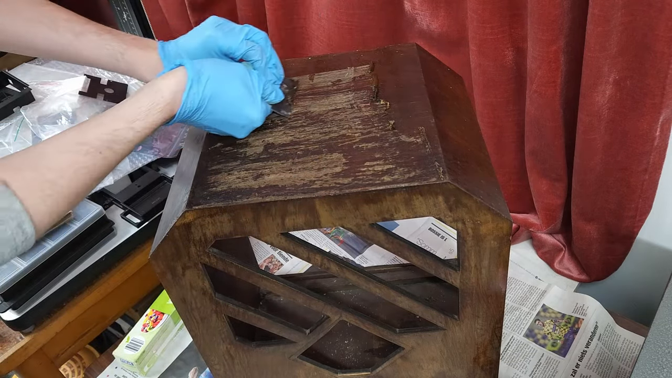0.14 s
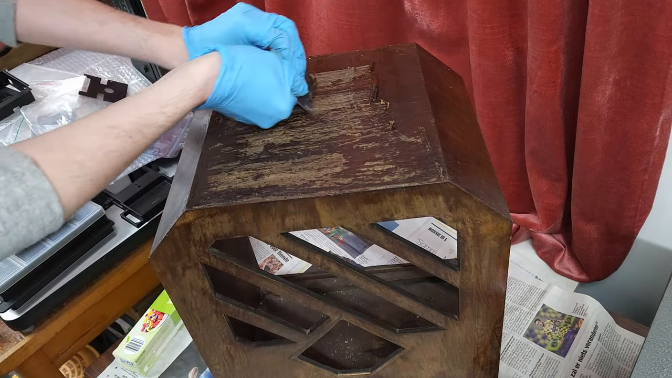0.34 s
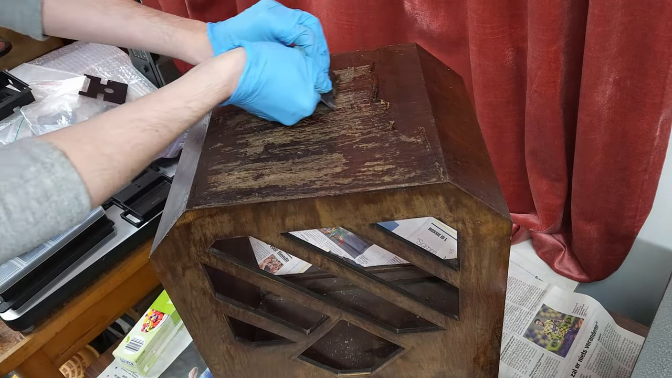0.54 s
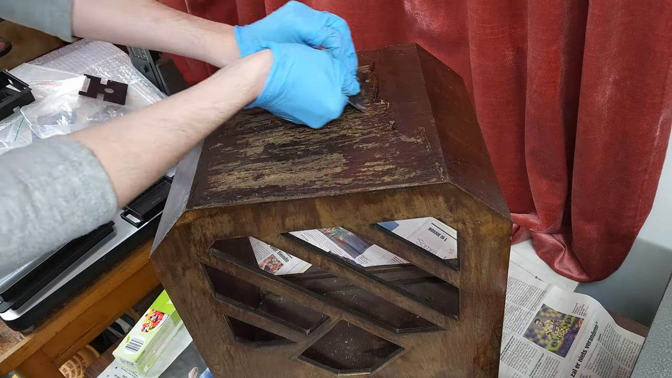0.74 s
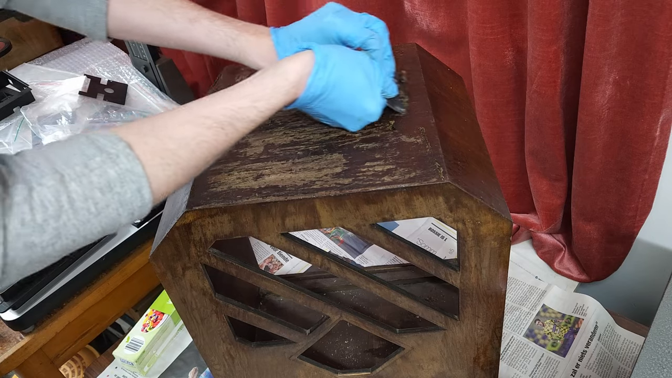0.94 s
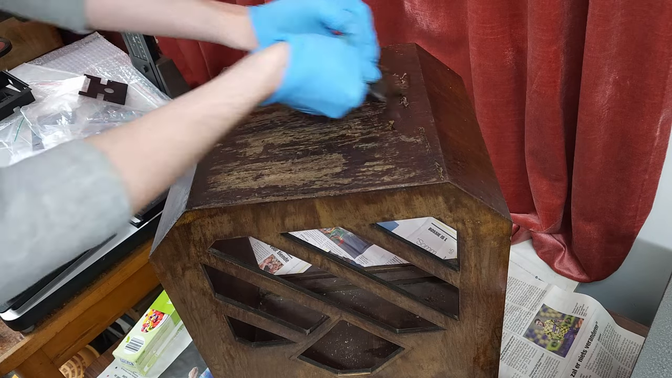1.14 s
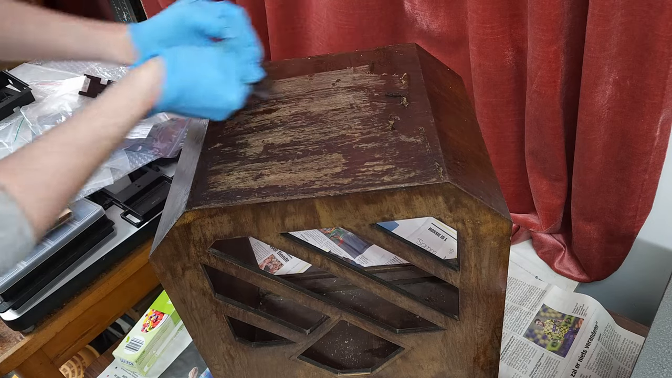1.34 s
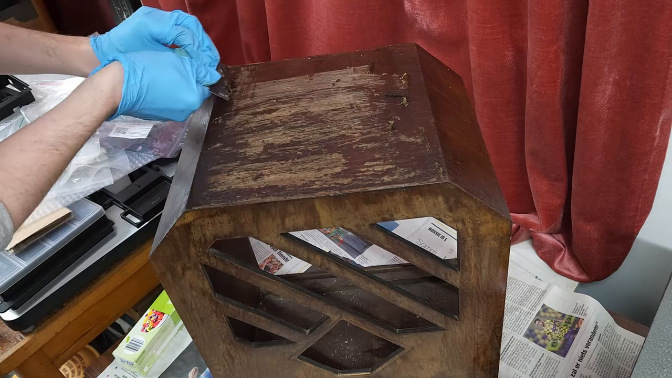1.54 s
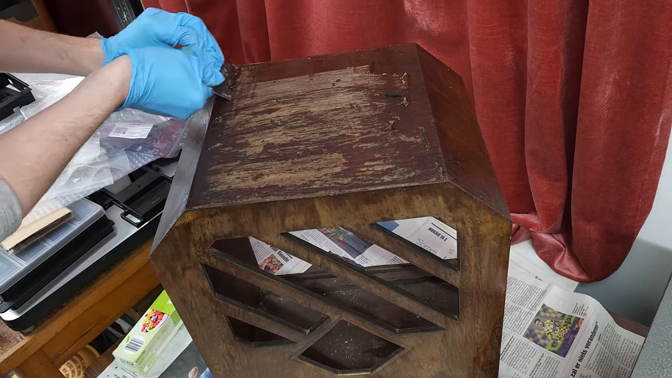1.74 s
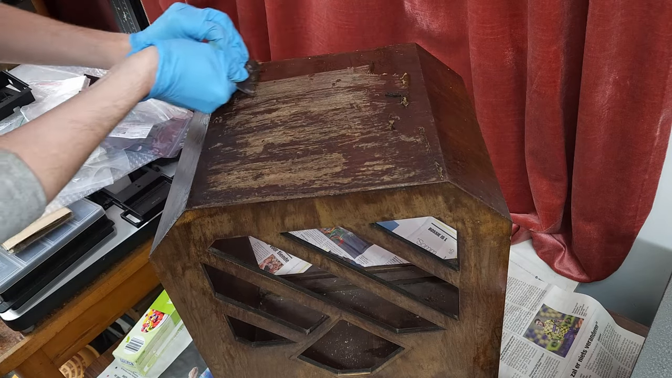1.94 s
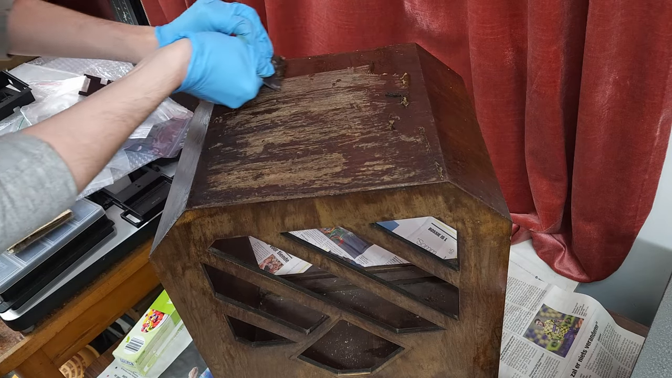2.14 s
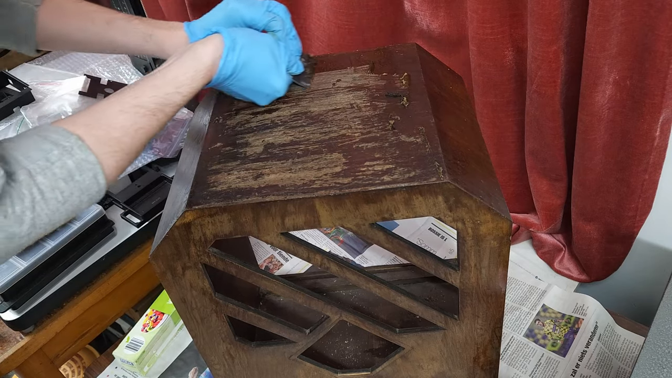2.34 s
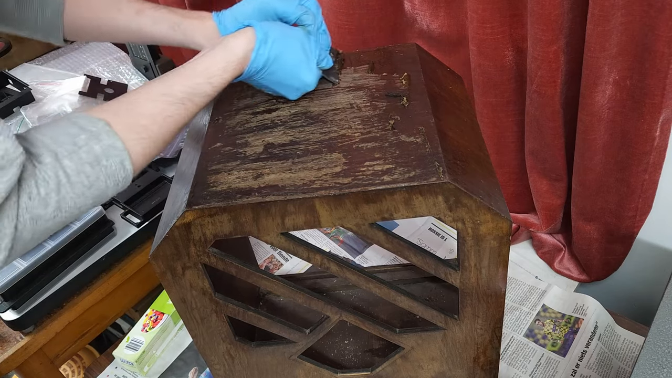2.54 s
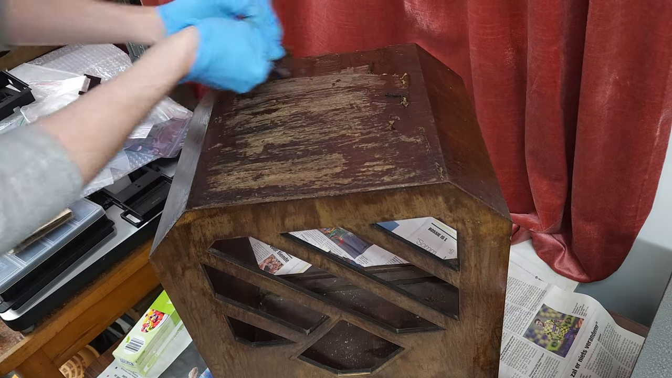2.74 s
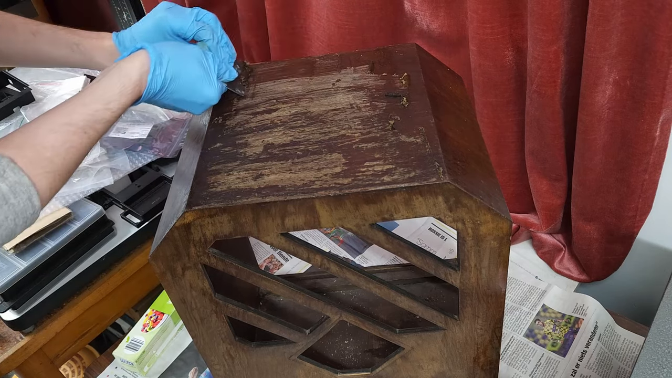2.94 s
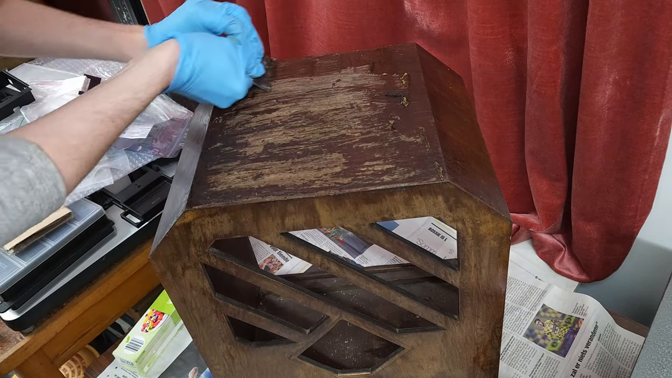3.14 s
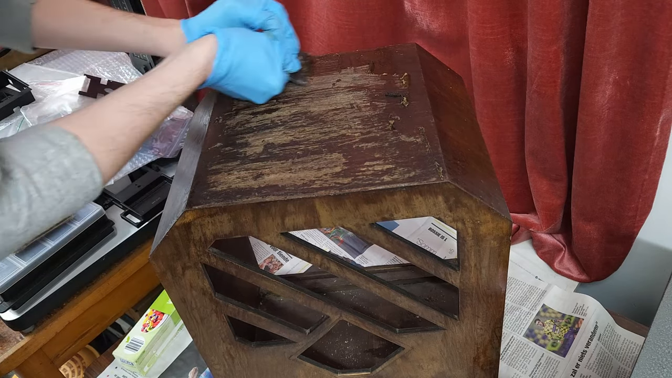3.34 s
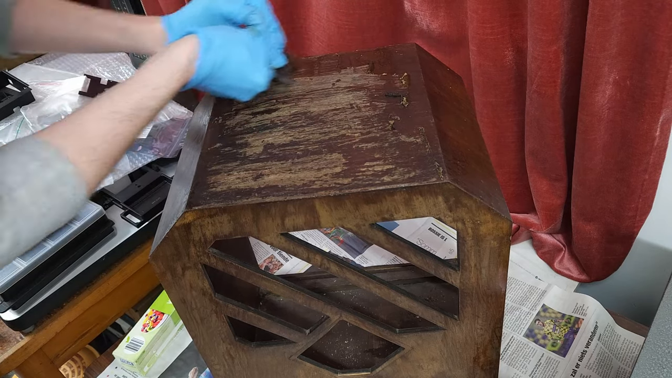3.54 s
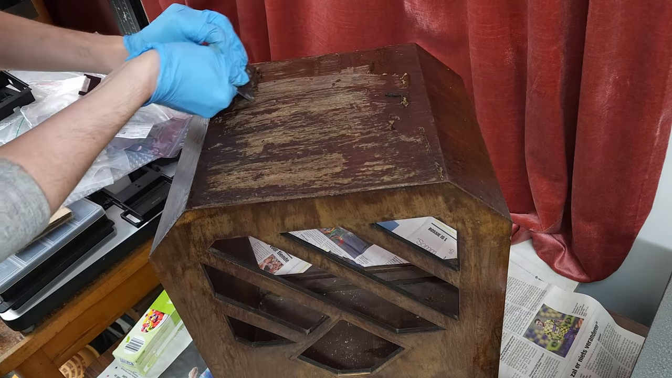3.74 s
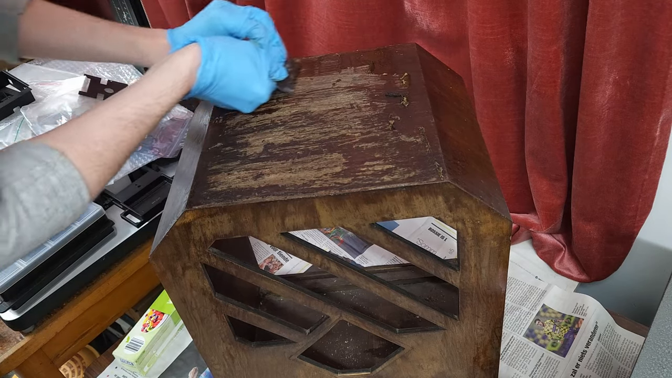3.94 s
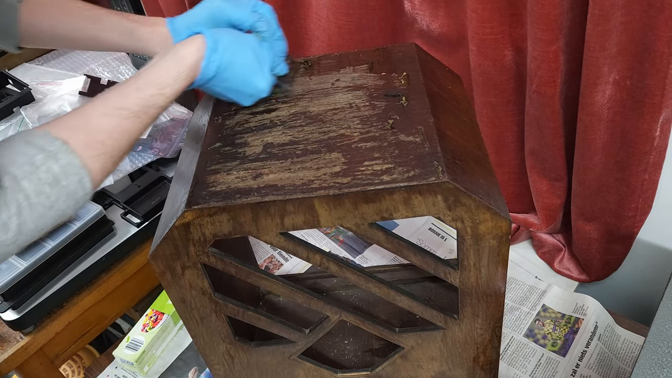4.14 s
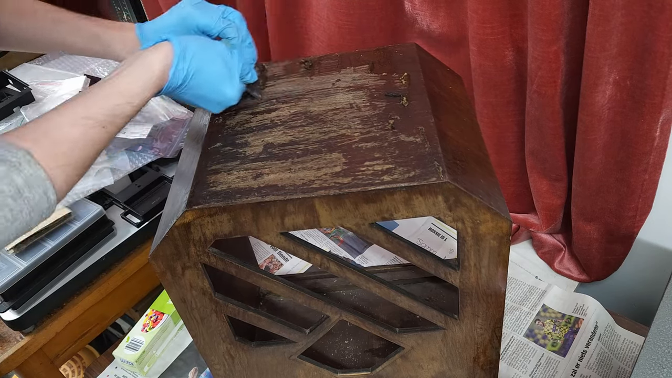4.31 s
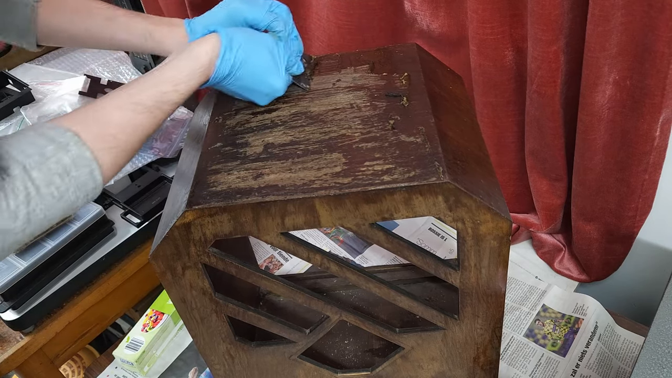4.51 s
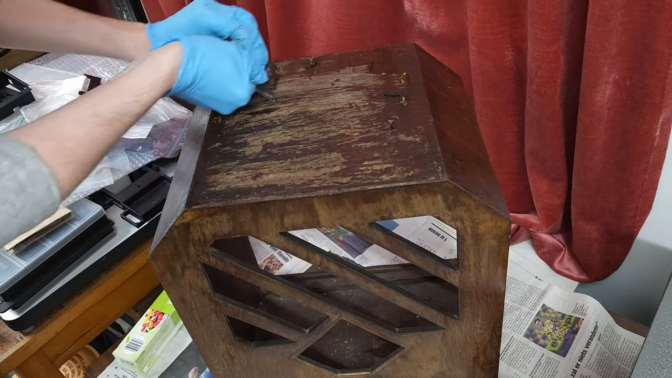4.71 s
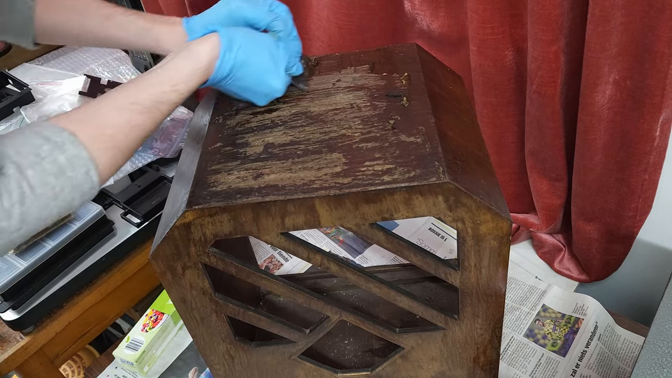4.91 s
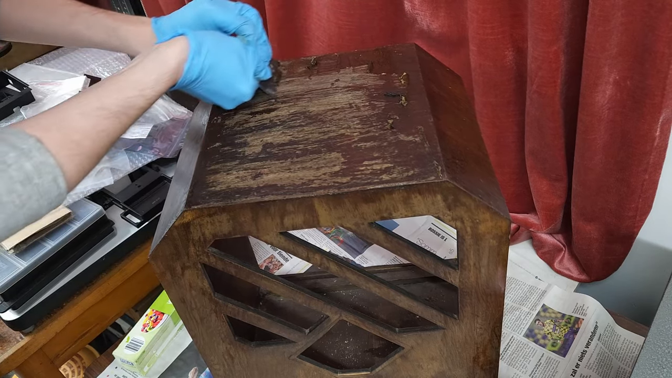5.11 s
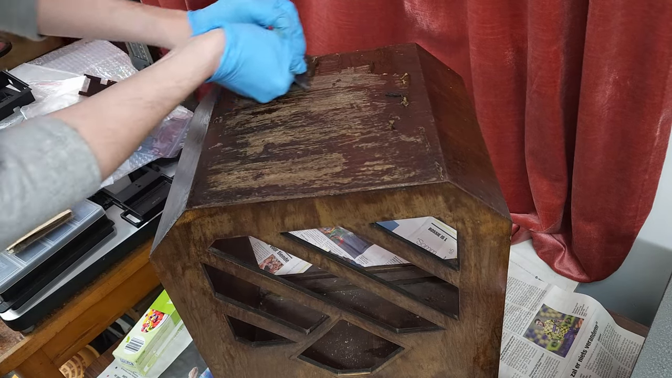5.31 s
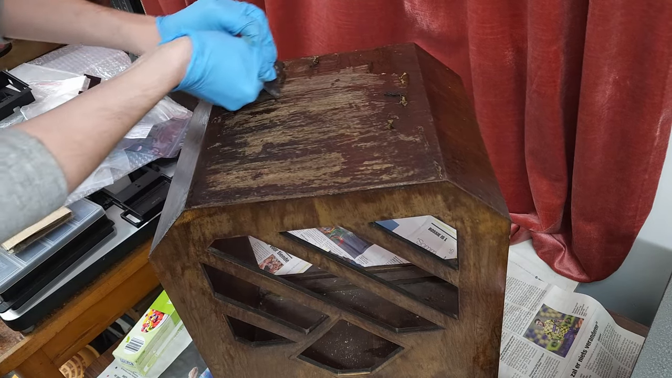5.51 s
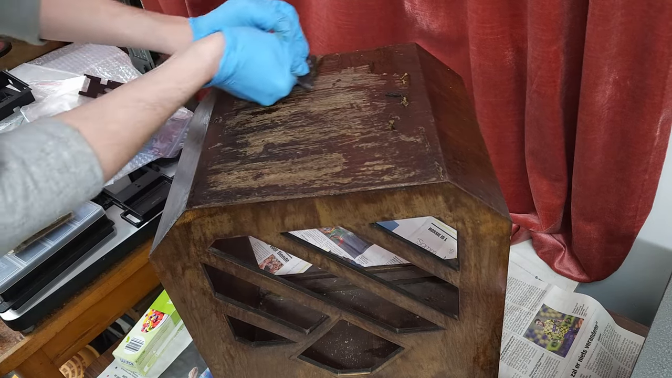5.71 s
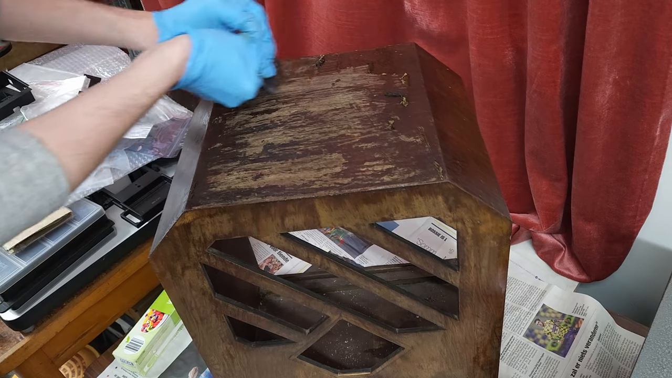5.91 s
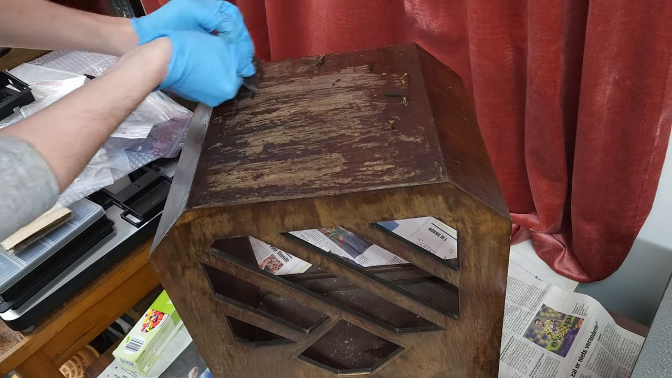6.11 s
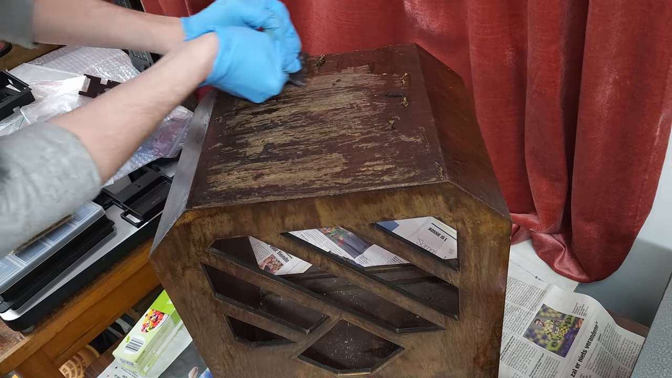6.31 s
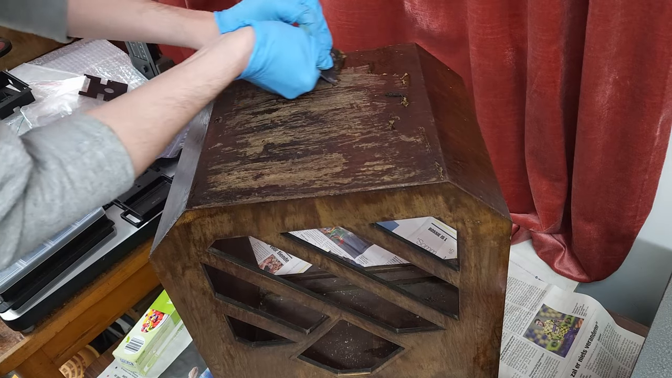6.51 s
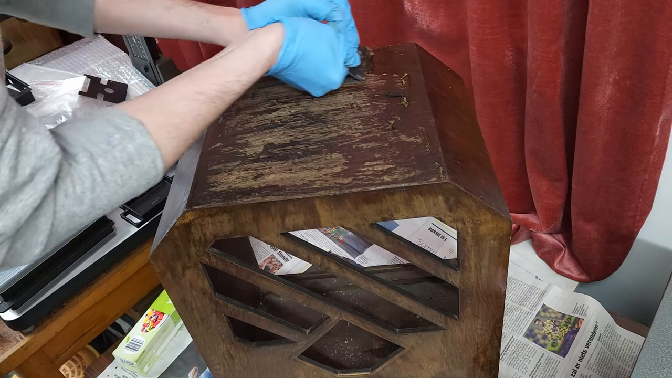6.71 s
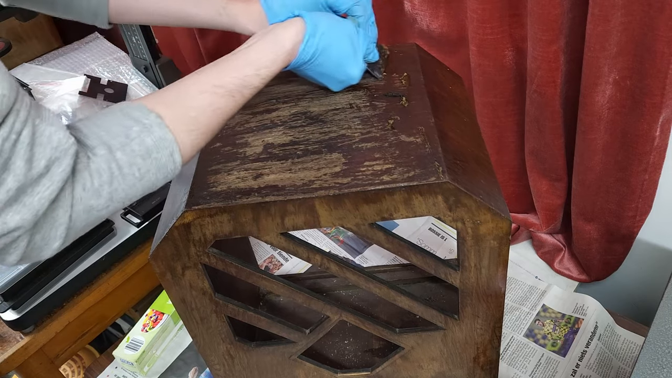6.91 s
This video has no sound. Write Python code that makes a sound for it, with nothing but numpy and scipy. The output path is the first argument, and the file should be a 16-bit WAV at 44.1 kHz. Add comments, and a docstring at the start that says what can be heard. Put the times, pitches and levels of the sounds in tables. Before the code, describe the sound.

Long, crackly scrapes of a steel blade strip varnish from a wooden cabinet, with a slight metallic ring and a hollow judder from the wood. After a brief pause and more long pushes comes a run of short strokes with ticks and dull bumps. Two hard clacks lead into three longer, fading scrapes. It is heard from about a metre away in a small, quiet room.

```python
"""In a quiet small room, a steel scraper is pushed in long strokes over a hollow wooden cabinet.
Its edge tears varnish in dense grains that ring blade and board; its judder drives the box's boom
and panel modes. The edge clacks as it lands or catches, and the hands jolt the cabinet. From 3 s the
strokes turn short; near 6 s come the hardest clacks, then three longer strokes, each one softer.
A phone with two close ports listens from a metre away."""
import sys
import numpy as np
from scipy import signal
from scipy.fft import rfft, irfft, next_fast_len
from scipy.io import wavfile
from scipy.ndimage import uniform_filter1d

SR = 44100
rng = np.random.default_rng(int(sys.argv[2]) if len(sys.argv) > 2 else 0)


def wrap_up_sound(samples):
    """Save the sound to the file named by the first command line argument, as 16-bit audio."""
    columns = np.atleast_2d(samples).T
    # keep every value between -1 and 1, then stretch to whole-number steps
    tamed = np.clip(columns, -1, 1)
    steps = np.round(tamed * 32767).astype(np.int16)
    wavfile.write(sys.argv[1], SR, steps)


N = 306936

# Strokes, split where the blade hitches; cue levels here and below are pre-mix:
# full contact t/s, length/s, base time to rise 20 dB/s, rasp level/dB, its change/dB, bite over rasp/dB,
# sheen over rasp/dB, panel level/dB, its change/dB, boom level/dB, its change/dB, bench level/dB
STROKES = [(-0.035, 0.213, 0.012, -53.0, -7.0, 3.0, -13.0, -46.0, -2.5, -38.0, -6.5, -57.5),
           (0.15, 0.182, 0.017, -68.0, -3.0, 7.5, -22.5, -59.0, 3.0, -50.0, -9.0, -78.0),
           (0.436, 0.395, 0.089, -54.0, 0.5, 2.5, -15.5, -51.0, -6.5, -55.0, 7.5, -59.5),
           (0.805, 0.204, 0.09, -55.0, -3.5, -1.0, -13.5, -73.0, 1.0, -64.5, 0.5, -65.0),
           (1.07, 0.07, 0.02, -85.0, -3.0, -0.5, -16.0, -79.0, -3.0, -72.0, -4.0, -80.0),
           (1.881, 0.326, 0.068, -57.0, -2.0, 2.0, -13.0, -54.5, 7.5, -47.5, 12.5, -64.5),
           (2.215, 0.366, 0.09, -58.0, 2.5, 5.0, -14.0, -46.5, -2.5, -50.5, 3.0, -56.5),
           (2.652, 0.022, 0.022, -53.0, -5.0, 0.5, -9.5, -57.0, -5.5, -71.0, 14.0, -78.0),
           (3.08, 0.09, 0.033, -54.0, 3.0, 2.0, -8.0, -45.0, 3.0, -38.5, -0.5, -56.0),
           (3.232, 0.205, 0.09, -58.0, 9.5, 3.0, -7.5, -46.5, 3.0, -40.0, -2.5, -61.0),
           (3.832, 0.244, 0.027, -50.0, -4.5, 3.0, -10.5, -45.0, -5.0, -38.0, -7.0, -55.5),
           (4.169, 0.122, 0.031, -53.0, 5.0, 1.5, -2.0, -49.0, 1.5, -55.0, 14.0, -71.5),
           (4.404, 0.144, 0.025, -42.5, -6.0, 1.0, -8.5, -45.5, 1.5, -38.0, -0.5, -55.0),
           (4.669, 0.099, 0.048, -50.0, -6.5, 1.5, -5.0, -47.5, -3.5, -49.0, 9.5, -70.0),
           (4.863, 0.1, 0.032, -48.5, 3.5, 1.5, -9.5, -47.0, 3.0, -44.0, 9.5, -50.5),
           (5.088, 0.099, 0.036, -46.0, -14.0, 1.0, -4.5, -46.5, -6.5, -40.5, -1.5, -58.0),
           (5.271, 0.1, 0.021, -44.5, 1.0, 0.5, -7.5, -44.5, 3.0, -43.0, 11.0, -49.5),
           (5.482, 0.069, 0.043, -51.5, -4.0, 2.0, -5.5, -48.0, 0.5, -56.0, 9.5, -57.5),
           (5.672, 0.086, 0.021, -49.5, 2.0, 2.5, -11.5, -49.0, 2.5, -48.5, 2.5, -52.5),
           (5.892, 0.143, 0.037, -55.0, 8.0, 0.5, -4.0, -63.0, 8.5, -56.0, 7.0, -77.5),
           (6.195, 0.217, 0.036, -44.5, -11.0, -2.5, -13.0, -40.0, -7.0, -40.5, -0.5, -64.0),
           (6.425, 0.246, 0.015, -64.0, -0.5, 4.0, -16.0, -53.5, -7.0, -58.5, 2.5, -77.5),
           (6.668, 0.193, 0.012, -72.5, 6.0, 3.0, -18.5, -66.0, 3.5, -67.0, 11.5, -76.5)]
# Tone of the tearing varnish: f/Hz, level/dB
RASP_EQ = [(1200, -14), (2500, -4.5), (4000, -10.5), (5500, -10.5), (8000, -13.5), (9400, -17),
           (11000, -30)]
SHEEN_EQ = [(7000, -30), (9800, 0), (12500, -1), (15500, -6)]
# Resonances of blade and cabinet, high to low: f/Hz, width/Hz, level/dB
BLADE_MODES = [(2560, 320, -1), (3640, 330, 0), (4830, 330, -3), (6170, 380, -5), (7400, 450, -7)]  # steel ring
BITE_MODES = [(856, 144, -3), (1208, 108, 0), (1480, 110, -4), (1655, 123, -.5), (1839, 110, -2),
              (2195, 307, -5.5)]  # midrange bite
PANEL_MODES = [(399, 36.3, -4.5), (479, 13.2, 2), (528.5, 32.6, -1), (576, 44, -2), (577, 17.4, -0.5),
               (652.3, 29, -4.5)]  # woody body
BOOM_MODES = [(195, 30, -12), (241, 14, 0), (266, 25, -10)]  # hollow box
BENCH_MODES = [(131.7, 45, -7.5), (134.7, 13.3, 4), (166.6, 8.3, -3)]  # bass weight
ROCK_MODE = [(62, 22, 0)]  # cabinet rocking
# House rumble and hiss: f/Hz, level/dB
ROOM_TONE_EQ = [(25, -16), (60, -5), (240, -2), (530, -8), (720, -18.5), (1000, -12.5), (1250, -23),
                (1600, -20), (2500, -29.5), (8700, -27.5), (9500, -44), (15500, -40)]
# The edge lands or catches, or a flake snaps: t/s, level/dB, t60/s, clack f/Hz, clack share, top f/Hz
TAPS = [(.45, -50, .25, 1700, 1.8, 2400), (1.152, -74.5, .06, 7050, 1.2, 8500),
        (1.661, -49.5, .075, 1200, 1.3, 5100), (2.035, -50, .051, 7340, 1, 13000),
        (2.957, -41, .11, 2400, .29, 6940), (3.073, -50, .04, 1200, .6, 4000),
        (3.145, -47.5, .04, 9100, .7, 14000), (3.424, -45, .027, 9100, .69, 14000),
        (3.722, -52.5, .09, 1590, .59, 2460), (3.815, -44, .085, 860, .66, 3980),
        (4.394, -41, .04, 1650, .6, 6000), (4.852, -43, .04, 1650, .6, 6000),
        (5.666, -44, .04, 1650, .6, 6000), (5.985, -31.5, .046, 1560, 1.8, 3530),
        (6.018, -38.5, .16, 1450, 1.5, 3500), (6.175, -39, .04, 860, .6, 4000)]
# Jolts from the hands: t/s, boom level/dB, bench level/dB, rocking level/dB
JOLTS = [(.62, -44, -66, -71), (.97, -46, -58, -73), (1.93, -46, -62, -80), (2.04, -35, -43, -69),
         (2.35, -35, -47, -75), (2.73, -56, -50, -63), (2.97, -66, -80, -88), (3.13, -34, -52, -73),
         (3.53, -54, -75, -84), (3.73, -64, -76, -88), (4.4, -43, -52, -68), (5.31, -38, -60, -58),
         (6.17, -34, -48, -65), (6.91, -62, -53, -78)]
# The phone's microphone response: f/Hz, level/dB
MIC_EQ = [(20, 0), (8900, 0), (9500, -11), (16000, -13)]

# How each layer follows a stroke: rise time multiplier, release/(dB/s), dip at both ends/dB
RASP_SHAPE, BITE_SHAPE, SHEEN_SHAPE = (1.01, 390, 3.3), (1.05, 400, 2.3), (.94, 345, 5.6)
PANEL_SHAPE, BOOM_SHAPE, BENCH_SHAPE = (1.05, 270, 1.5), (1.2, 165, 3.2), (1.6, 135, 1.1)
CONTROL_TIMES_S = np.arange(0, N, 32) / SR


def undb(db):
    return 10 ** (np.asarray(db) / 20)


def unit(x):
    return x / np.sqrt(np.mean(x ** 2))


def to_audio_rate(gain):
    return np.interp(np.arange(N) / SR, CONTROL_TIMES_S, gain)


def eq(x, points, lag_s=0.):
    """Shapes the tone along (f/Hz, level/dB) points, with an optional delay."""
    size = next_fast_len(N + 4096)
    hz = np.arange(size // 2 + 1) * SR / size
    point_hz, db = np.transpose(points)
    gain = undb(np.interp(np.log(hz + 1), np.log(point_hz), db))
    delay = np.exp(-2j * np.pi * hz * lag_s)
    return irfft(rfft(x, size) * gain * delay, size)[..., :N]


def drift(rate_hz):
    """Glides between random values; rms 1."""
    hold = int(SR / rate_hz)
    steps = np.repeat(rng.standard_normal(N // hold + 1), hold)
    return unit(uniform_filter1d(steps, hold)[:N])


def stroke_envelope(db, change_db, shape):
    """Each stroke swells, arches from its first level to its last and dies away; powers add."""
    start, length, rise = np.transpose(STROKES)[:3, :, None]
    rise_scale, release_db_s, dip_db = shape
    t = CONTROL_TIMES_S - start
    progress = np.clip(t / length, 0, 1)
    level_db = db[:, None] + change_db[:, None] * progress - dip_db * (2 * progress - 1) ** 2
    level_db += 20 * np.minimum(t, 0) / (rise_scale * rise)
    level_db -= release_db_s * np.maximum(t - length, 0)
    return to_audio_rate(np.sqrt(np.sum(undb(level_db) ** 2, axis=0)))


def grains(rate_hz, spread_db, hiss):
    """Crackle: random clicks of long-tailed size over a bed of hiss."""
    clicks = (rng.random(N) < rate_hz / SR) * rng.standard_normal(N)
    clicks *= undb(spread_db * rng.exponential(size=N))
    return unit(unit(clicks) + hiss * rng.standard_normal(N))


def ring(force, modes, wander_db=0.):
    """Resonators of alternating polarity; wander varies each one's drive as the edge travels."""
    out, power = 0, 0
    for k, (hz, width, db) in enumerate(modes):
        drive = force * undb(db + wander_db * drift(5.))
        out += (-1) ** k * signal.lfilter(*signal.iirpeak(hz, hz / width, SR), drive)
        power += undb(db) ** 2 * np.pi * width / SR
    return out / np.sqrt(power)


def tearing_varnish():
    """Flakes crackle in the air while other breaks along the edge ring blade and board."""
    rasp_db, change_db, bite_db, sheen_db = np.transpose(STROKES)[3:7]
    rasp_gain = stroke_envelope(rasp_db, change_db, RASP_SHAPE)
    bite_gain = stroke_envelope(rasp_db + bite_db, change_db, BITE_SHAPE)
    sheen_gain = stroke_envelope(rasp_db + sheen_db, change_db, SHEEN_SHAPE)
    tear = unit(grains(rate_hz=1800, spread_db=2, hiss=1.88) * undb(.54 * drift(60.)))
    flakes = unit(eq(grains(rate_hz=2200, spread_db=2.4, hiss=1.42), RASP_EQ))
    steel = ring(tear * rasp_gain, BLADE_MODES, wander_db=1.1)
    bite = ring(tear * bite_gain, BITE_MODES, wander_db=1.1)
    sheen = unit(eq(tear, SHEEN_EQ)) * sheen_gain  # drier flakes tear with more top
    return .83 * flakes * rasp_gain + .77 * steel + bite + sheen


def edge_judder():
    """The edge sticks and lets go unevenly, pushing the wood in bursts."""
    return unit(grains(rate_hz=600, spread_db=1.5, hiss=2.6) * undb(.85 * drift(25.)))


def slip_lock(swing, window_s):
    """The edge slips in step with the wood's swing, evening it out like a compressor."""
    envelope = np.abs(signal.hilbert(swing, next_fast_len(N))[:N])
    envelope = uniform_filter1d(envelope, int(window_s * SR))
    return unit(swing / (envelope + .3) ** .7)


def cabinet(judder, taps):
    """Judder and taps ring the hollow box; jolts swell its low end."""
    panel_db, panel_change_db, boom_db, boom_change_db, bench_db = np.transpose(STROKES)[7:]
    panel_gain = stroke_envelope(panel_db, panel_change_db, PANEL_SHAPE)
    boom_gain = stroke_envelope(boom_db, boom_change_db, BOOM_SHAPE)
    bench_gain = stroke_envelope(bench_db, np.zeros_like(bench_db), BENCH_SHAPE)
    boom_jolt_db, bench_jolt_db, rock_jolt_db = np.transpose(JOLTS)[1:]
    boom_swell = np.hypot(boom_gain, hand_jolts(boom_jolt_db, release_db_s=190))
    bench_swell = np.hypot(bench_gain, hand_jolts(bench_jolt_db, release_db_s=190))
    rock_swell = np.hypot(bench_gain * undb(-19), hand_jolts(rock_jolt_db, release_db_s=75))
    boom = slip_lock(ring(judder, BOOM_MODES), window_s=.013) * boom_swell
    knocks = ring(.6 * taps, BOOM_MODES)
    panel = ring(judder * panel_gain + .46 * taps, PANEL_MODES, wander_db=1.8)
    bench = slip_lock(ring(judder, BENCH_MODES), window_s=.027) * bench_swell
    rocking = ring(judder * rock_swell, ROCK_MODE)
    return boom + knocks + panel + bench + rocking


def room_echoes(x, patterns=6, t60_s=.092):
    """Tight, bass-light reflections, different at each port; their pattern shifts as the edge travels."""
    t = np.arange(SR // 8) / SR
    blend = np.array([drift(22.) for _ in range(patterns)])
    blend /= np.sqrt(np.sum(blend ** 2, axis=0))
    decay = np.exp(-np.log(1000) * t / t60_s) * (t > .002)
    echoes = rng.standard_normal((patterns, 2, len(t))) * decay
    echoes /= np.sqrt(np.sum(echoes ** 2, axis=2, keepdims=True))
    wet = signal.oaconvolve((x * blend)[:, None], echoes, axes=2).sum(axis=0)[:, :N]
    bright = signal.lfilter(*signal.butter(2, 577, "high", fs=SR), wet)
    return undb(1) * bright + undb(-15) * wet


def room_tone():
    """A quiet bed of house rumble and port hiss, narrower in the bass."""
    mid, side = eq(rng.standard_normal((2, N)), ROOM_TONE_EQ)
    side = eq(side, [(60, -3), (400, -4), (1300, 1)])
    bed = np.array([mid + side, mid - side]) / np.std(mid)
    return bed * undb(-77.8 + .4 * drift(7.7))


def edge_taps():
    """Each landing is a tick, a clack of the blade and a short scatter of flakes."""
    out = np.zeros(N)
    t = np.arange(SR // 4) / SR
    tick = (1 + 1.6 * np.exp(-t / .0055)) * np.minimum(t / .001, 1)
    for start_s, db, t60_s, clack_hz, clack_share, top_hz in TAPS:
        burst = rng.standard_normal(len(t)) * np.exp(-np.log(1000) * t / t60_s) * tick
        flakes = signal.lfilter(*signal.butter(3, [600, top_hz], "band", fs=SR), burst)
        clack = signal.lfilter(*signal.iirpeak(clack_hz, Q=4, fs=SR), flakes)
        tap = undb(db) * (.37 * flakes + clack_share * clack)
        i = int(start_s * SR)
        out[i:i + len(t)] += tap[:N - i]
    return out


def hand_jolts(db, release_db_s, attack_db_s=400):
    """Envelope of the hands leaning in or letting go: a quick swell and a slower fade."""
    t = CONTROL_TIMES_S - np.array(JOLTS)[:, :1]
    level_db = db[:, None] + np.minimum(attack_db_s * t, -release_db_s * t)
    return to_audio_rate(undb(level_db).sum(axis=0))


def scene():
    """Edge, wood and room meet at the two ports; the right one is a touch brighter and later."""
    scrape = tearing_varnish()
    judder = edge_judder()
    taps = edge_taps()
    edge = scrape + taps
    wood = cabinet(judder, taps)
    direct = edge * undb(-4) + wood
    left = eq(direct, [(500, .6), (2000, -1.3)])
    right = eq(direct, [(500, .31), (2000, 1.3)], lag_s=98e-6)
    heard = np.array([left, right]) + room_echoes(edge + wood)
    return eq(heard, MIC_EQ) + room_tone()


def record(dry):
    """The phone rolls off the rumble and cuts the very top."""
    dry = signal.lfilter(*signal.butter(2, 52., "high", fs=SR), dry)
    return signal.sosfilt(signal.ellip(10, .2, 80, 15550, fs=SR, output="sos"), dry)


dry = scene()
out = record(dry)
wrap_up_sound(out)
```